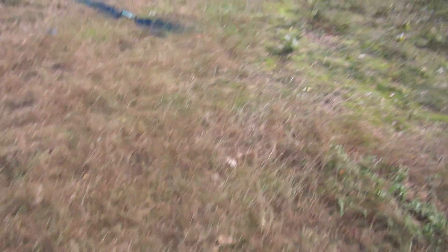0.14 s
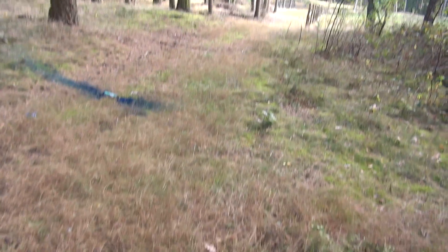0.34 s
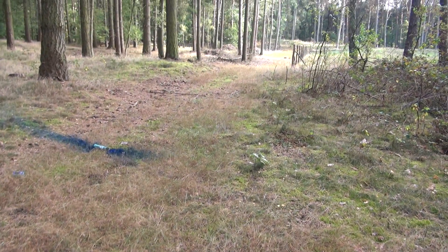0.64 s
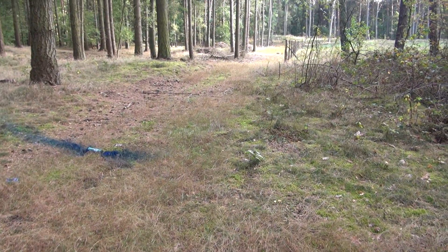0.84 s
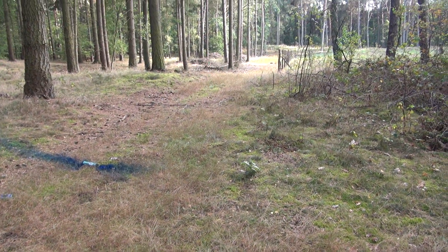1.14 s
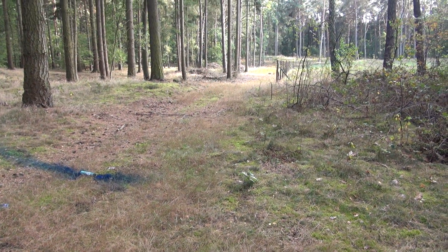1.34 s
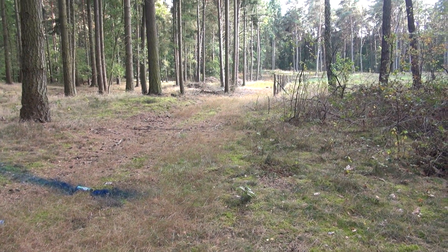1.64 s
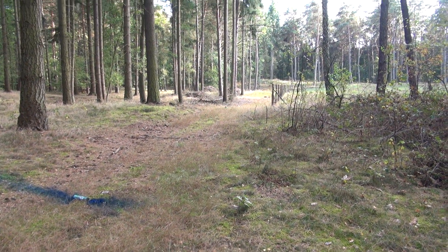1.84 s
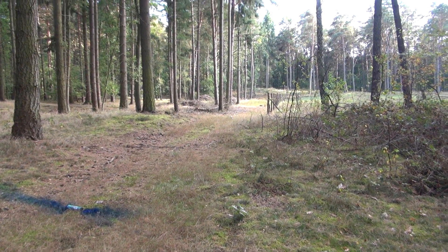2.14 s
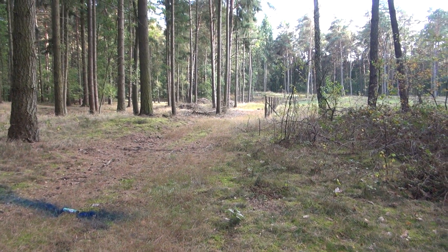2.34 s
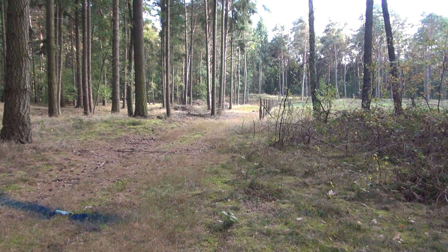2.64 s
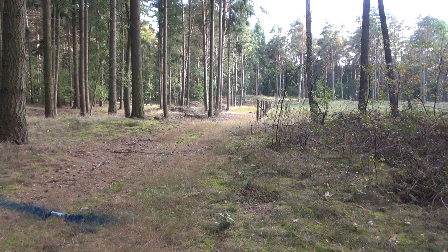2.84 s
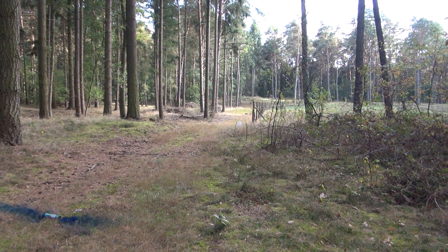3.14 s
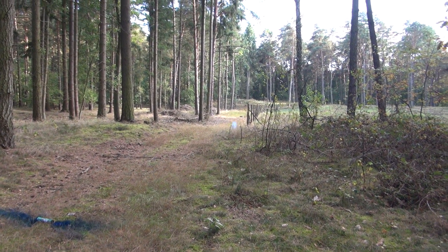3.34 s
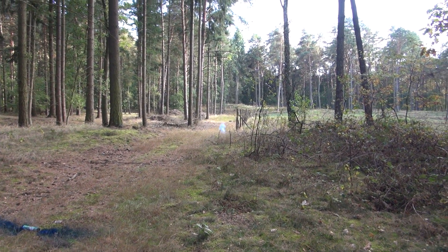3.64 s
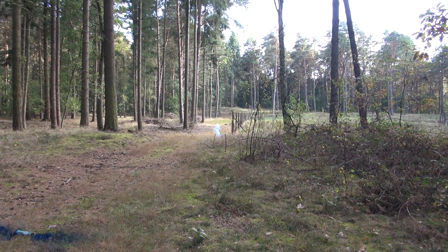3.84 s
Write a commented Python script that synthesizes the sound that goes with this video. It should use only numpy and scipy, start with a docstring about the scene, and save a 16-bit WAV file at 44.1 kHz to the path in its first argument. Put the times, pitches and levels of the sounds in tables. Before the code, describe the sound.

A loud firecracker bang cracks across a quiet forest clearing, echoing off the trees

```python
"""A firecracker blast down a forest clearing: pressure front, inverted ground return, low boom, trunk echoes.
A near and a deep swarm of scattered clicks make its long tail; bright scatter comes off the grass.
Around it, a hand-held camera: cloth grains rustle, noise bursts tick, knocks ring the casing modes.
Its motor adds hum lines, a wandering whine and lens tones, and pulses the treble hiss.
Banded noise makes the far outdoor rumble and circuit hiss underneath."""
import sys
import numpy as np
from scipy import signal
from scipy.io import wavfile

SR = 44100
rng = np.random.default_rng(int(sys.argv[2]) if len(sys.argv) > 2 else 0)


def generate_wav(signal):
    """Clip the signal to [-1, 1] and save it as 16-bit WAV at the path in sys.argv[1]."""
    frames = np.transpose(np.atleast_2d(signal))
    scaled = np.clip(frames, -1, 1) * 32767
    pcm = np.round(scaled).astype(np.int16)
    wavfile.write(sys.argv[1], SR, pcm)


def voltage_ratio(decibels):
    """Convert decibels (scalar or array-like) to amplitude ratios, 20 dB per decade."""
    exponent = np.asarray(decibels, float) / 20
    return 10 ** exponent


N = 176400

BANG_S = 3.0871
BUZZ_HZ = 49.9  # motor pulse rate

# Left-right likeness of air and cloth. Each row: frequency in Hz, correlation from -1 to 1.
AIR_LIKENESS = [(40, 0.13), (130, 0.71), (1400, 0.69), (15000, 0.033)]


def rms_one(x):
    """Scale to rms 1."""
    return x / np.sqrt(np.mean(x ** 2) + 1e-20)


def at_hz(points, hz):
    """Read a table on a log-frequency axis."""
    table_hz, values = np.transpose(points)
    return np.interp(np.log(hz), np.log(table_hz), values)


def in_time(rows):
    """Table columns as signals, interpolated over time."""
    s, *columns = np.transpose(rows)
    return [np.interp(np.arange(N) / SR, s, c, right=c[-1]) for c in columns]


def band_pass(x, low_hz, high_hz):
    """Second-order Butterworth design, band form."""
    return signal.sosfilt(signal.butter(2, [low_hz, high_hz], "band", fs=SR, output="sos"), x)


def high_pass(x, hz):
    """Second-order Butterworth high-pass."""
    return signal.sosfilt(signal.butter(2, hz, "high", fs=SR, output="sos"), x)


def drift(rate_hz, size):
    """Slow random wander, spread 1: noise through two equal poles, one value per 40 samples."""
    r = np.exp(-80 * np.pi * rate_hz / SR)
    noise = rng.standard_normal(size // 40 + 2002)
    slow = signal.lfilter([1], [1, -2 * r, r * r], noise)[2000:]  # settled part
    return np.interp(np.arange(size) / 40, np.arange(len(slow)), rms_one(slow))


def tone(hz):
    """Sine of height 1 whose frequency follows a signal."""
    return np.sin(2 * np.pi * np.cumsum(hz) / SR)


def ring(clicks, hz, t60_s):
    """Two-pole resonator: a unit click sets a sine of initial height 1 ringing."""
    r = voltage_ratio(-60 / (t60_s * SR))
    w = 2 * np.pi * min(hz, .4 * SR) / SR
    return signal.lfilter([0, np.sin(w)], [1, -2 * r * np.cos(w), r * r], clicks + 1e-18)


def pan(db):
    """Left and right gains; positive is left."""
    return voltage_ratio(np.array([[db / 2], [-db / 2]]))


def hand_pan_db(s):
    """The hand starts 8 dB left and moves across, centred at 3.4 s."""
    return 8 * (1 - s / 3.4)


def bands(sources, likeness):
    """Half-octave stereo bands, dealt in turn from two mid-side sources; yields centre and sound."""
    edges_hz = 25 * 2 ** np.arange(0, 9.6, .5)
    for k, (low, high) in enumerate(zip(edges_hz, edges_hz[1:])):
        mid, side = band_pass(sources[k % 2], low, high)
        hz = np.sqrt(low * high)
        alike = np.clip(at_hz(likeness, hz), -1, 1)
        yield hz, np.sqrt(1 + alike) * mid + np.sqrt(1 - alike) * side * [[1], [-1]]


def grains(rate_per_s, spread_db, size):
    """Two mid-side pairs of random clicks, scaled to even power as the rate changes."""
    shape = (2, 2, size)
    share = np.clip(rate_per_s / SR, 1e-4, 1)
    spread = voltage_ratio(spread_db * np.minimum(rng.exponential(1, shape), 5))
    heights = spread * rng.standard_normal(shape)
    return rms_one(heights * (rng.random(shape) < share) / np.sqrt(share))


def background():
    """Outdoor rumble and circuit hiss: noise, patchy by band, its treble pulsed by the motor."""
    # Spectrum. Each row: frequency in Hz, relative density in dB per Hz.
    air = [(25, -2.5), (91, -9.5), (352, -3.5), (1060, -10.5), (2270, -19.5), (7230, -28.5), (10500, -31),
           (14200, -38), (15800, -32)]
    level_db, buzz_depth, buzz_from_hz = -50.5, 0.09, 2500
    t = np.arange(N) / SR
    pulse = 1 + buzz_depth * rms_one(np.cos(np.pi * BUZZ_HZ * t) ** 30.0 - .15)
    together = drift(7.9, size=N)
    out = 0
    for hz, band in bands(rng.standard_normal((2, 2, N)), AIR_LIKENESS):
        buzz = np.abs(pulse) if hz > buzz_from_hz else 1
        band_db = at_hz(air, hz) + 0.56 * together + 1.65 * drift(4.3, size=N)
        out = out + band * buzz * voltage_ratio(band_db)
    return voltage_ratio(level_db) * rms_one(out)


def motor():
    """Steady rotation gives wavering, pulsed hum lines and a wandering whine; the lens drive adds rough tones."""
    # Hum lines. Each row: frequency in Hz, level in dB rms before pulsing and drift.
    hum = [(102, -63.5), (151, -62.5), (199, -67.5), (3849, -75), (5800, -76.5), (7125, -73.5), (7780, -77)]
    # Whine path. Each row: time in seconds, frequency in Hz, wobble spread in Hz.
    whine = [(0, 14230, 40), (.9, 14280, 50), (1.4, 14000, 50), (2.3, 14120, 60), (2.48, 14230, 190),
             (2.74, 13850, 130), (2.85, 14050, 50)]
    # Lens drive tones. Each row: start in seconds, length in seconds, frequency in Hz, level in dB rms before drift.
    lens = [(0.862, 0.2, 10050, -80), (2.33, .19, 10050, -81)]
    line_pulse, whine_db, wobble_rate_hz = 0.35, -73.5, 25.0
    t = np.arange(N) / SR
    out = np.zeros(N)
    for hz, db in hum:
        level = voltage_ratio(db + drift(7.3, size=N))
        out += level * tone(hz * (1 + 0.00148 * drift(5.74, size=N)))
    out *= 1 + line_pulse * np.cos(2 * np.pi * BUZZ_HZ * t)
    whine_hz, wobble_hz = in_time(whine)
    whine_level = voltage_ratio(whine_db + 2 * drift(30.0, size=N))
    out += whine_level * tone(whine_hz + wobble_hz * drift(wobble_rate_hz, size=N))
    for s, length, hz, db in lens:
        running = (t > s) * (t < s + length)
        out += voltage_ratio(db + 6.1 * drift(30.0, size=N)) * running * np.sin(2 * np.pi * hz * t)
    return np.sqrt(2) * out  # sine height from rms


def rustle():
    """Dense cloth grains that swell with movement; faster rubbing lifts the top of the hiss."""
    # Cloth movement. Each row: time in seconds, level in dB rms before pan and catches, top of the hiss in Hz.
    movement = [(0, -46, 8650), (.07, -49, 5600), (.2, -56.5, 4830), (.46, -55, 5460), (.545, -49.5, 5740),
                (.59, -49.5, 13400), (.7, -48, 6600), (.79, -58, 8000), (1.28, -62, 4000),
                (1.36, -47, 3270), (1.53, -47.5, 3870), (1.56, -75, 5100)]
    # Cloth spectrum. Each row: frequency in Hz, relative density in dB per Hz.
    cloth = [(150, -10.5), (500, -5), (2000, -13.5), (10500, -13), (13500, -15)]
    grains_per_s, fall_db_per_octave = 3400, 15.5  # fall above the top
    level_db, top_hz = in_time(movement)
    catches_db = 0.63 * drift(90.0, size=N)
    out = 0
    for hz, band in bands(grains(grains_per_s, 0.61, size=N), AIR_LIKENESS):
        fall_db = fall_db_per_octave * np.log2(1 + (hz / top_hz) ** 2) / 2
        out = out + band * voltage_ratio(at_hz(cloth, hz) - fall_db + 2.0 * drift(19.0, size=N))
    hand = pan(hand_pan_db(np.arange(N) / SR))[:, 0]
    return rms_one(out) * voltage_ratio(level_db + catches_db) * hand


def ticks():
    """Small contacts on the camera: dying noise bursts in a wide band."""
    # Each row: start in seconds, peak in dB before pan, pitch in Hz.
    tick_rows = [(.058, -37, 595), (.125, -38, 432), (.135, -33, 435), (0.232, -37.5, 780),
                 (0.286, -45.5, 2090), (0.441, -35.5, 1040), (.697, -38, 497), (0.739, -41.5, 1800),
                 (1.233, -39, 9500), (1.2329, -39, 2500), (1.241, -41, 2500), (1.351, -34.5, 630),
                 (1.377, -43, 1800), (1.53, -55, 2820), (2.044, -38, 1460), (2.044, -41.5, 4600),
                 (2.309, -45, 7400), (2.333, -35.5, 1700), (2.432, -40, 930), (2.808, -39, 850),
                 (2.922, -32, 6600)]
    t60_cycles, t60_min_s, spread_ratio = 6.8, 0.018, 1.7  # spread: band reach either side of the pitch
    out = np.zeros((2, N + SR))
    t = np.arange(SR // 20) / SR
    for s, db, hz in tick_rows:
        burst = rng.standard_normal(len(t)) * voltage_ratio(-60 * t / max(t60_cycles / hz, t60_min_s))
        tick = band_pass(burst, hz / spread_ratio, min(hz * spread_ratio, .45 * SR))
        gains = voltage_ratio(db) * pan(hand_pan_db(s))
        out[:, int(s * SR):][:, :len(t)] += gains * tick / np.abs(tick).max()
    return out[:, :N]


def knocks():
    """Dull blows ring the casing modes; small parts ring on as pings."""
    # Blows. Each row: time in seconds, click height in dB.
    blow_rows = [(1.223, -34), (1.235, -24), (1.243, -26.5), (2.044, -31.5), (2.501, -40.5)]
    # Casing modes. Each row: frequency in Hz, gain in dB, T60 in seconds.
    casing = [(155, -9.5, 0.09), (208, 3, 0.08), (409, -7, 0.044)]
    # Pings. Each row: start in seconds, frequency in Hz, initial height in dB, T60 in seconds.
    pings = [(1.2335, 5850, -47, .03), (1.254, 4900, -62, .25)]
    blows = np.zeros(N)
    for s, db in blow_rows:
        blows[int(s * SR)] = voltage_ratio(db)
    modes = sum(voltage_ratio(db) * ring(blows, hz, t60_s) for hz, db, t60_s in casing)
    out = high_pass(modes, 150)
    for s, hz, db, t60_s in pings:
        out += ring(voltage_ratio(db) * signal.unit_impulse(N, int(s * SR)), hz, t60_s)
    return out


def forest():
    """Countless trunk echoes: a near swarm that holds, then dies fast, and a deep one that lingers."""
    # Scatter from the clearing's edge and the deep wood. Each row: frequency in Hz, relative density in dB per Hz.
    near_spectrum, far_spectrum = [(70, -8), (150, 10), (500, 6), (1100, 6.5), (3500, 4.5), (5000, -3),
                                   (8000, -4.5), (15800, -14)], [(150, -22.5), (580, -0.5), (2100, -5.5), (3800, -14),
                                                 (12000, -26)]
    # Decay times. Each row: frequency in Hz, T60 in seconds.
    near_t60, far_t60 = [(60, 1), (250, 0.39), (700, 0.71), (2000, 0.72), (5000, 0.7), (9000, 0.45),
                         (15000, 0.1)], [(300, 3.75), (1200, 2.9), (3000, 2.38), (12000, 0.16)]
    # Hold before the near decay. Each row: frequency in Hz, hold in seconds.
    near_hold = [(200, 0.024), (1500, 0.095), (7000, 0.084), (15000, 0.0085)]
    # Left-right likeness. Each row: frequency in Hz, correlation from -1 to 1.
    wood_likeness = [(60, 0.58), (950, 0.83), (3770, .53), (15000, .04)]
    # Grass scatter: low and high band edge in Hz.
    spray_hz = [5500, 11000]
    echoes_per_s, growth_s, spread_db = 11000, 0.38, 0.5  # echoes thicken with delay
    near_db, far_db, far_rise_s, wood_pan_db = -18.5, -26, 0.27, 1.7
    build_share = 0.03  # build-up time constant as a share of the hold
    patchy_db, roll_db = .7, .5  # uneven stands of trees: by band, all together
    spray_db, spray_t60_s = -16.5, 0.085
    start = int(BANG_S * SR)
    t = np.arange(N - start) / SR
    size = len(t)
    echoes = grains(echoes_per_s * (1 + t / growth_s) ** 2, spread_db, size)
    near, far, near_power, far_power = 0, 0, 0, 0
    roll = roll_db * drift(18.0, size)
    for hz, band in bands(echoes, wood_likeness):
        band = band * voltage_ratio(patchy_db * drift(25.0, size) + roll)
        power = np.mean(band ** 2)
        near_band_db, far_band_db = at_hz(near_spectrum, hz), at_hz(far_spectrum, hz)
        hold_s = at_hz(near_hold, hz)
        build = 1 - np.exp(-t / build_share / hold_s)
        late_s = np.maximum(t - hold_s, 0)
        near = near + band * build * voltage_ratio(near_band_db - 60 * late_s / at_hz(near_t60, hz))
        far = far + band * voltage_ratio(far_band_db - 60 * t / at_hz(far_t60, hz))
        near_power += power * voltage_ratio(2 * near_band_db)
        far_power += power * voltage_ratio(2 * far_band_db)
    tail = voltage_ratio(near_db) * near / np.sqrt(near_power)
    tail += voltage_ratio(far_db) * far / np.sqrt(far_power) * (1 - np.exp(-t / far_rise_s))
    # bright scatter off the grass beside the blast
    spray = band_pass(echoes[0, 0] + echoes[1] / 2, *spray_hz)
    tail += voltage_ratio(spray_db - 60 * t / spray_t60_s) * spray
    return pan(wood_pan_db) * np.pad(tail, ((0, 0), (start, 0)))


def pressure_front(t):
    """Sudden push that swings into suction and dies away."""
    push_s, fall = .00036, .5  # time to zero pressure; fading per push_s
    x = t / push_s
    return (t >= 0) * (1 - x ** 2) / (1 + x ** 2) * np.exp(-fall * np.abs(x))


def blast():
    """Pressure front, its inverted return off soft ground, a low boom and single-trunk echoes."""
    # Each row: delay in seconds, gain in dB, sign (+1 upright, -1 inverted).
    trunks = [(.0244, -2.5, 1), (.0374, -7, -1), (.0510, -10, -1), (.0650, -10, -1), (.1300, -11, 1)]
    direct_db, ground_delay_s, ground_db = 6.0, 0.0005, -5.5
    boom_hz, boom_db, boom_t60_s, boom_rise_s = 149.6, -12.5, 0.025, .00036  # boom_db before direct_db
    t = np.arange(SR // 5) / SR
    pulse = pressure_front(t) - voltage_ratio(ground_db) * pressure_front(t - ground_delay_s)
    boom = -voltage_ratio(boom_db - 60 * t / boom_t60_s) * np.cos(2 * np.pi * boom_hz * t)
    boom *= 1 - np.exp(-t / boom_rise_s)
    dull = signal.sosfilt(signal.butter(2, 6000, fs=SR, output="sos"), pulse)
    out, i = np.zeros((2, N)), int(BANG_S * SR)
    out[:, i:i + len(t)] += voltage_ratio(direct_db) * (pulse + boom)
    for delay_s, db, sign in trunks:
        j = i + int(delay_s * SR)
        out[:, j:j + len(t)] += np.sign(sign) * voltage_ratio(db) * dull
    return out


def scene():
    """Everything the microphones hear; sharp pressure steps lose their deep bass in the capsule."""
    sharp = high_pass(blast() + ticks() + knocks(), 21)
    return sharp + forest() + background() + motor() + rustle()


def band_limit(x):
    """A steep low-pass at the top of the band."""
    return signal.sosfilt(signal.butter(12, 15960, fs=SR, output="sos"), x)


def record(dry):
    """High peaks are rounded off, then deep bass and top are cut."""
    clip_level, low_hz, top_hz = 0.99, 45, 16700
    rounded = clip_level * np.tanh(dry / clip_level)
    top_cut = signal.cheby2(12, 70, top_hz, fs=SR, output="sos")
    mix = signal.sosfilt(top_cut, high_pass(rounded, low_hz))
    return band_limit(mix)


dry = scene()
out = record(dry)
generate_wav(out)
```